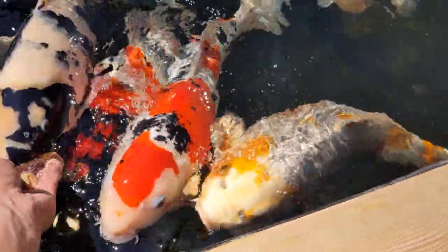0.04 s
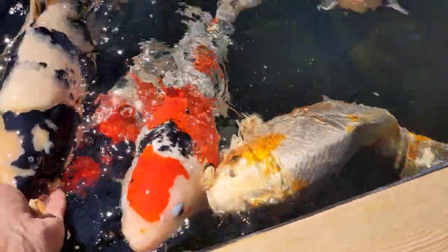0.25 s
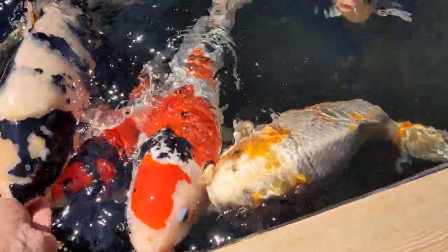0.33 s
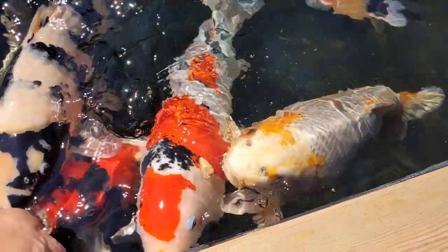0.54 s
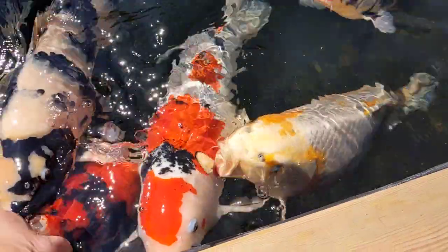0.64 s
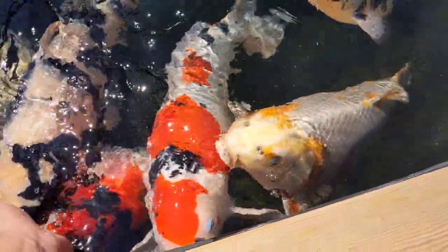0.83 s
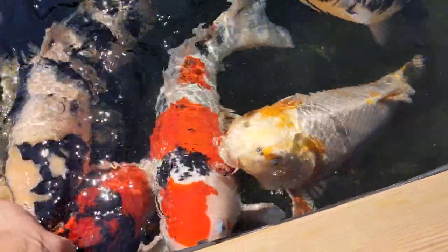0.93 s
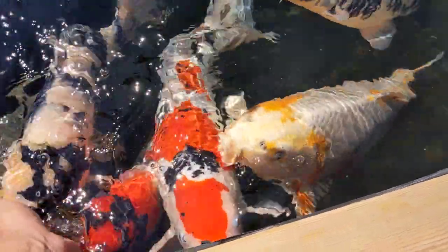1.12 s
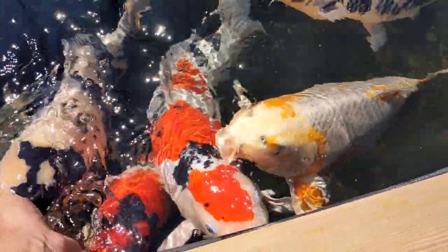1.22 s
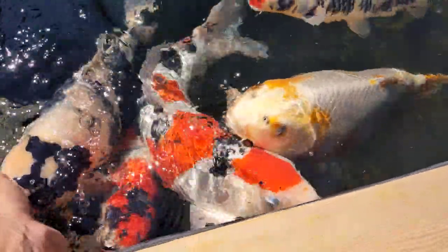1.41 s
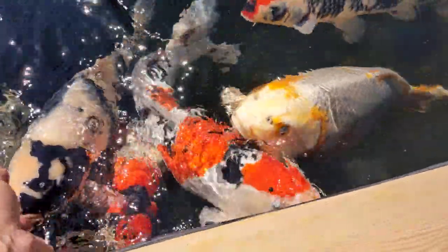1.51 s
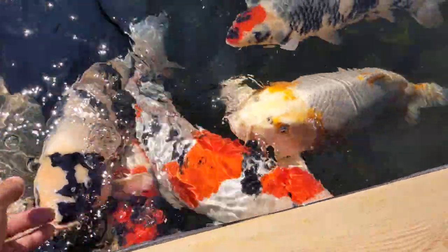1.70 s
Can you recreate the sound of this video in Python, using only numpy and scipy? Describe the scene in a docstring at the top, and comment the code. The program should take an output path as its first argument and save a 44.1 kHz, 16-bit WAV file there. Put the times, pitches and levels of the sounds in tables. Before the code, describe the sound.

Close up, fish smack and slurp at the surface of an outdoor pond. Two brief splashy bursts are followed by rising bubble chirps and lighter plops, while water laps gently and a pump hums faintly underneath.

```python
"""Carp feeding in a garden pond

Large carp feed at the surface, close to a pair of microphone ports. Their lips smack and slurp
in short wet splashes; trapped air pops, plops and chirps upward as it rises, and foam squelches.
Small bubbles and droplets tick in between, over lapping water and the low hum of a pump."""
import sys
import numpy as np
from scipy import signal
from scipy.fft import rfft, irfft
from scipy.io import wavfile

SR = 44100
rng = np.random.default_rng(int(sys.argv[2]) if len(sys.argv) > 2 else 0)


def unload_audio(sound):
    """Save the sound as a 16-bit wav file, at the path given as the first command line argument."""
    columns = np.transpose(np.atleast_2d(sound))
    # keep every value between -1 and 1, then stretch to whole-number steps
    steps = np.round(np.clip(columns, -1, 1) * 32767)
    wavfile.write(sys.argv[1], SR, steps.astype(np.int16))


N = 77175

# The wash of distant water and machinery. Each row: frequency in Hz, relative level in dB.
WASH_COLOUR = [(20, -28), (35, -4.5), (55, 3), (85, 15), (125, 0), (200, -11.5), (450, -11), (800, -12),
               (1800, -19.5), (3600, -26.5), (10000, -32), (16000, -44)]
# How alike left and right are in the wash and echoes. Each row: frequency in Hz, correlation.
STEREO_LIKENESS = [(30, 1), (300, 0.8), (1000, 0.61), (3000, 0.17), (15000, 0.13)]
# The fader ride on the stirred water. Each row: time in seconds, gain in dB.
STIR_FADER = [(0, -6.5), (.13, -6), (.3, -4), (0.399, 3), (.51, 0.5), (0.742, -4), (.83, -7.5), (.97, -2.5),
              (1.06, -1.5), (1.109, -7.5), (1.301, -1), (1.418, -1.5), (1.68, 2), (1.75, -11)]
# The tone of spray and ripples before their tilt. Each row: frequency in Hz, relative level in dB.
SPRAY_COLOUR = [(40, -51), (150, -5.5), (300, 2), (800, 7), (2000, -0.5), (2900, -2.5), (4200, -8),
                (6000, -9.5), (9600, -10.5), (13500, -20), (16000, -20.5)]
# Droplets and tiny bursting bubbles. Each row: start in seconds, pitch in Hz, level in dB.
TICK_CUES = [(.149, 4240, -34.5), (.2865, 5820, -20.5), (.478, 2220, -37.5), (.538, 3010, -30.5),
             (.579, 1880, -23), (.597, 3840, -29.5), (.598, 8640, -29.5), (.602, 6250, -29.5),
             (.87, 6370, -15), (1.035, 5800, -38), (1.121, 9300, -39.5), (1.219, 3770, -38.5),
             (1.236, 11500, -38), (1.293, 14500, -31.5), (1.347, 6300, -33.5), (1.3663, 4950, -25),
             (1.454, 9940, -31.5)]
# Water sucked in or thrown up as spray. Each row: start in seconds, hold in seconds, level in dB,
# tilt in dB per octave, fade (t60) in seconds.
SLURP_CUES = [(.15, 0.0065, -50, 3.5, .05), (.2015, 0.0064, -39, 2.5, 0.012),
              (0.2132, 0.013, -30, 3.5, 0.027), (0.226, 0.012, -21.5, 2.5, 0.037),
              (0.2423, 0.0055, -18, 1.35, 0.014), (0.253, 0.012, -36.5, 0.5, 0.078),
              (.286, 0.0017, -30, 4, 0.017), (0.578, 0.02, -44, 2.5, 0.18), (.681, 0.032, -24, 0.96, 0.012),
              (0.72, 0.0078, -47.5, 4, 0.13), (0.8689, 0.0042, -22, 2.5, 0.0089),
              (.875, 0.011, -31.5, 0.2, 0.099), (0.9237, 0.0012, -21.5, -3, 0.0077),
              (0.936, 0.0062, -19, 1, 0.005), (0.943, 0.013, -32.5, 0, 0.042),
              (1.152, 0.025, -47, -8.5, 0.14), (1.3648, 0.0029, -31.5, -0.4, 0.009),
              (1.539, 0.019, -46.5, -3, .2)]
# Air pockets popping open at the lips. Each row: start in seconds, pitch in Hz, level in dB,
# rise in seconds, decay (t60) in seconds, glide in octaves.
POP_CUES = [(.188, 770, -28.5, 0.00075, 0.012, -0.32), (0.1953, 954, -29, 0.0024, 0.068, 0.87),
            (0.2174, 832, -16.5, 0.0015, 0.022, 0.37), (.2275, 700, -17.5, 0.001, 0.02, 0.63),
            (.2428, 2080, -12.5, 0.0034, 0.018, -0.28), (0.2457, 840, -16.5, 0.0013, 0.012, 0.03),
            (.248, 472, -17.5, 0.0031, 0.02, -0.066), (.245, 244, -31, 0.0028, 0.03, 0.67),
            (.402, 468, -35, .0012, .02, -0.0044), (.503, 440, -37, 0.0028, 0.037, 0.25),
            (.58, 466, -33.5, 0.0019, 0.026, -0.098), (0.634, 990, -22.5, 0.0015, 0.0074, -0.19),
            (0.6431, 1270, -22.5, 0.00077, 0.0034, -0.021), (0.653, 1130, -30.5, 0.0019, 0.029, -0.15),
            (.681, 1360, -7, 0.00079, 0.002, 0.38), (0.8716, 1206, -7, 0.0015, 0.0041, -0.025),
            (0.872, 2403, -7, 0.0012, 0.0011, -0.44), (.8745, 867, -18, 0.0011, 0.035, -0.53),
            (.8835, 610, -27.5, .001, 0.055, -0.35), (0.907, 514, -25.5, 0.0023, 0.026, -.4),
            (.925, 280, -26.5, .0015, 0.014, -.3), (.9363, 500, -14.5, 0.0013, 0.0099, -0.047),
            (.938, 2816, -2.5, 0.0012, 0.002, -0.15), (0.9433, 3030, -16.5, 0.00037, 0.0095, 0.26),
            (.9362, 208, -22, 0.0013, 0.048, 0.21), (.97, 229, -39.5, 0.005, .09, 0.16),
            (1.015, 450, -34, 0.0011, 0.035, 0.6), (1.145, 233, -34.5, 0.011, 0.04, 0.23),
            (1.303, 770, -38, 0.0018, .018, -0.099), (1.332, 462, -37.5, 0.0014, 0.041, -0.088),
            (1.368, 438, -35.5, 0.0017, 0.028, -0.18), (1.379, 2640, -19, 0.00074, 0.018, -0.96),
            (1.39, 315, -35, 0.00067, 0.073, -0.28), (1.4062, 843, -21.5, .0012, 0.027, 0.045),
            (1.413, 724, -30, 0.0011, 0.031, -0.4), (1.419, 1010, -32.5, 0.0023, 0.06, 0.5),
            (1.531, 280, -30, 0.0027, 0.047, 0.91), (1.5491, 643, -24, 0.0018, 0.0052, -0.38),
            (1.726, 796, -40.5, 0.00058, 0.027, -0.089)]
# Bubbles nearing the surface. Each row: start in seconds, length in seconds, first pitch in Hz,
# last pitch in Hz, level in dB, crest of the swell as a share of the length.
CHIRP_CUES = [(0.245, 0.044, 905, 2407, -28.5, 0.42), (.44, 0.055, 960, 1350, -41, 0.11),
              (0.542, 0.036, 700, 1480, -45.5, 0.29), (1.152, 0.027, 953, 1840, -45.5, 0.11),
              (1.191, 0.044, 386, 994, -26, 0.73), (1.178, .115, 205, 1030, -35.5, 0.61),
              (1.234, 0.02, 790, 1000, -22.5, 0.058), (1.231, .04, 1050, 1250, -37.5, .06),
              (1.446, 0.057, 537, 1700, -31.5, 0.41)]
# Foam squeezed between bodies. Each row: start in seconds, length in seconds, centre in Hz, level in dB.
SQUELCH_CUES = [(.335, 0.11, 2374, -48.5), (.565, 0.035, 2618, -42), (1.015, .06, 2290, -51),
                (1.408, 0.04, 2746, -45)]
# The outdoor echo tail. Each row: frequency in Hz, decay (t60) in seconds.
TAIL_DECAY = [(150, 0.41), (800, 0.12), (3000, 0.14), (14000, 0.082)]
# Phase between the ports. Each row: frequency in Hz, lead of the left in radians.
PORT_PHASE = [(60, 0.5), (500, -1), (1000, 0.95), (1500, 1.05), (2000, 3.5), (2700, 6), (3700, 4.5),
              (4700, 8), (7000, 9.5), (16000, 22)]
# Balance between the ports. Each row: frequency in Hz, left minus right in dB.
PORT_BALANCE = [(250, 2.5), (450, 6), (740, -1), (1220, -0.5), (2000, -13), (3300, 1.5), (5500, 5.5),
                (9000, 0), (15000, -1)]

LN_1000 = np.log(1000)  # a 60 dB fall, which takes one t60


def amp(db):
    """Decibels to gain."""
    return 10 ** (np.asarray(db) / 20)


def unit(x):
    """Scales to rms 1."""
    return x / np.sqrt(np.mean(x ** 2) + 1e-20)


def curve_at(points, hz):
    """Reads a table on a log-frequency axis."""
    f, value = np.transpose(points)
    return np.interp(np.log(hz + 1), np.log(f + 1), value)


def add(mix, start_s, sound):
    """Lays a stereo sound into the mix."""
    part = mix[:, max(round(start_s * SR), 0):][:, :sound.shape[1]]
    part += sound[:, :part.shape[1]]


def wander(hz, size):
    """Smooth random movement of rms 1, rolling off above hz."""
    f = np.fft.rfftfreq(size, 1 / SR)
    return unit(irfft(rfft(rng.standard_normal(size)) / (1 + (f / hz) ** 4), size))


def clicks(per_s, spread_db, size):
    """Random impulses, mostly small, a few large."""
    height = amp(spread_db * np.minimum(rng.exponential(1, size), 4)) * rng.choice([-1, 1], size)
    return height * (rng.random(size) < per_s / SR)


def spray_eq(size, tilt_db):
    """The spray's gain at each frequency, tilted by tilt_db per octave around 2 kHz."""
    hz = np.fft.rfftfreq(size, 1 / SR)
    return amp(curve_at(SPRAY_COLOUR, hz) + tilt_db * np.log2((hz + 100) / 2000))


def air_ring(hz, rise, t60, glide, rough=0.14, size=8192):
    """An air pocket swells, then dies away while its pitch glides; its walls tremble."""
    t = np.arange(size) / SR
    pitch = hz * 2 ** (glide * np.minimum(t / t60, 1))
    attack = np.sin(np.pi / 2 * np.minimum(t / rise, 1)) ** 2
    decay = np.exp(-LN_1000 * np.maximum(t - rise, 0) / t60)
    phase = 2 * np.pi * np.cumsum(pitch) / SR
    tremble_hz = 890 + hz / 4
    tone = np.sin(phase) * (1 + rough * wander(tremble_hz, size))
    jitter = rough * wander(tremble_hz, size) * np.cos(phase)
    return attack * decay * (tone + jitter)


def distant_wash(db=-55.5):
    """A soft bed of far-off water and machinery, centred in the bass and wide on top."""
    hz = np.fft.rfftfreq(N, 1 / SR)
    left, other = rfft(rng.standard_normal((2, N)))
    likeness = curve_at(STEREO_LIKENESS, hz)
    right = likeness * left + np.sqrt(1 - likeness ** 2) * other
    return amp(db) * unit(irfft(np.array([left, right]) * amp(curve_at(WASH_COLOUR, hz)), N))


def pump_hum(hz=89, db=-67, waver=0.61):
    """The pump's low tone, wavering in phase and level."""
    phase = 2 * np.pi * hz * np.arange(N) / SR + waver * wander(13, N)
    return amp(db) * unit(np.sin(phase) * (1 + waver * wander(8.8, N)))


def bubble_cloud(pitches, per_s, db, spread_db, tilt_db, cycles, glide):
    """Small bubbles of many sizes ring at random, each size from its own direction."""
    out = np.zeros((2, N))
    for hz in pitches:
        gain = amp(db + tilt_db * np.log2(hz / pitches[0]))
        bubble = gain * air_ring(hz, rise=1 / hz, t60=cycles / hz, glide=glide)
        train = signal.oaconvolve(clicks(per_s / len(pitches), spread_db, N), bubble)[:N]
        out += [train, np.roll(train, rng.integers(-6, 7))]  # panned by a few samples of lag
    return out


def stirred_water(ripple_db=-58, clump_db=5):
    """Low lapping, bubbling, clumps of fine fizz and a soft rush of ripples around the moving fish."""
    lapping = bubble_cloud(np.geomspace(175, 480, 8), per_s=160, db=-54.5,
                           spread_db=2.8, tilt_db=-0.5, cycles=6, glide=0.13)
    bubbles = bubble_cloud(np.geomspace(400, 3300, 24), per_s=600, db=-60,
                           spread_db=4, tilt_db=1.24, cycles=19.7, glide=0.3)
    fizz = bubble_cloud(np.geomspace(3800, 14000, 12), per_s=110, db=-57.5,
                        spread_db=2.8, tilt_db=5.5, cycles=30, glide=0)
    noise = rng.standard_normal((2, N))
    ripples = amp(ripple_db) * unit(irfft(rfft(noise) * spray_eq(N, tilt_db=1.76), N))
    clumps = amp(clump_db * np.tanh(wander(25, N)))
    water = lapping + bubbles + clumps * fizz + np.sqrt(clumps) * ripples
    fader_db = np.interp(np.arange(N) / SR, *np.transpose(STIR_FADER))
    return water * amp(fader_db)


def droplet_tick(hz, db, snap_db=-9.5, snap_t60=0.003, size=2048):
    """A droplet lands or a tiny bubble bursts: a broad little snap and a brief, rough ring."""
    t, f = np.arange(size) / SR, np.fft.rfftfreq(size, 1 / SR)
    band = np.exp(-np.log2((f + 1) / hz) ** 2)
    snap = unit(irfft(rfft(rng.standard_normal(size)) * band))
    snap *= amp(snap_db) * np.exp(-LN_1000 * t / snap_t60)
    ring = air_ring(hz, rise=0.00014, t60=0.0084, glide=0, rough=0.48, size=size)
    return amp(db) * (snap + ring)


def spray(hold, db, tilt_db, t60, rise=0.0012, flutter_db=2.5, size=16384):
    """A fluttering burst of tiny drops that starts sharply, holds, then fades."""
    t = np.arange(size) / SR
    drops_per_s = 9000 * min(amp(db + 27), 1)  # below -27 dB it thins toward separate clicks
    drops = clicks(drops_per_s, spread_db=3.5, size=size)
    splash = irfft(rfft(drops) * spray_eq(size, tilt_db))
    flutter = amp(flutter_db * wander(195, size))
    envelope = np.minimum(t / rise, 1) * np.exp(-LN_1000 * np.maximum(t - hold, 0) / t60)
    return amp(db) * unit(splash * flutter) * envelope


def slurp(*cue, width=0.56):
    """A smack of the lips spreads spray over the water, so its treble differs left and right."""
    side = signal.sosfilt(signal.butter(2, 1000, "high", fs=SR, output="sos"), spray(*cue))
    return spray(*cue) + width * np.outer([1, -1], side)


def lip_pop(hz, db, rise, t60, glide):
    """A pocket of air pops open at the lips and rings."""
    return amp(db) * air_ring(hz, rise, t60, glide)


def bubble_chirp(length, first_hz, last_hz, db, crest, wobble_db=1.75, pitch_tremble=0.014):
    """A rising bubble swells and fades as its pitch climbs, wobbling on the way."""
    progress = np.arange(0, length, 1 / SR) / length
    skewed = progress ** (np.log(.5) / np.log(crest))  # reaches one half at the crest
    swell = np.abs(np.sin(np.pi * skewed)) ** 0.63
    wobble, tremble = wander(150, size=16384).reshape(2, -1)[:, :len(progress)]
    pitch = first_hz * (last_hz / first_hz) ** progress * (1 + pitch_tremble * tremble)
    return amp(db + wobble_db * wobble) * swell * np.sin(2 * np.pi * np.cumsum(pitch) / SR)


def foam_squelch(length, hz, db, width_hz=1170, glide_octaves=0.5, size=8192):
    """Squeezed foam rings in a broad, fuzzy resonance that climbs as the gap closes."""
    progress = np.minimum(np.arange(size) / SR / length, 1)
    centre_hz = hz * 2 ** (glide_octaves * (progress - .5))
    carrier = np.exp(2j * np.pi * np.cumsum(centre_hz) / SR)
    foam = wander(width_hz / 2, size) + 1j * wander(width_hz / 2, size)
    return amp(db) * np.sin(np.pi * progress) * (foam * carrier).real


def placed(sound, max_lag_s=0.00004):
    """Each sound comes from a slightly different spot, so its lag between the ports varies."""
    size = 2 * len(sound)
    lag_s = max_lag_s * (2 * rng.random() - 1)
    half_shift = np.exp(1j * np.pi * np.fft.rfftfreq(size, 1 / SR) * lag_s)
    return irfft(rfft(sound, size) * np.array([half_shift, 1 / half_shift]))[:, :len(sound)]


def feeding_carp():
    """The foreground: every slurp, pop, chirp, squelch and tick on its cue."""
    out = np.zeros((2, N))
    for start_s, *cue in SLURP_CUES:
        add(out, start_s, slurp(*cue))
    for cues, source in [(POP_CUES, lip_pop), (CHIRP_CUES, bubble_chirp),
                         (SQUELCH_CUES, foam_squelch), (TICK_CUES, droplet_tick)]:
        for start_s, *cue in cues:
            add(out, start_s, placed(source(*cue)))
    return out


def pond_echoes(mono, rim_db=-8.5, rim_t60=0.024, tail_db=-16.5, size=16384):
    """Quick reflections off the rim and a faint outdoor tail, both narrow in the bass."""
    hz, frame_s, noise = signal.stft(rng.standard_normal((3, size)), SR, nperseg=256)
    likeness = curve_at(STEREO_LIKENESS, hz)[:, None]
    diffuse = likeness * noise[2] + np.sqrt(1 - likeness ** 2) * noise[:2]
    tail_fade = np.exp(-LN_1000 * frame_s / curve_at(TAIL_DECAY, hz)[:, None])
    tail = signal.istft(diffuse * tail_fade, SR, nperseg=256)[1]
    t = np.arange(size) / SR
    rim_fade = np.exp(-LN_1000 * t / rim_t60) * (t > .0015)  # 1.5 ms of pre-delay
    rim = signal.istft(diffuse, SR, nperseg=256)[1][:, ::-1] * rim_fade
    response = amp(tail_db) * tail / np.linalg.norm(tail[0]) + amp(rim_db) * rim / np.linalg.norm(rim[0])
    return signal.fftconvolve(mono[None], response, axes=1)[:, :N]


def ports(pond, low_cut_hz=90):
    """The water is heard without deep bass, mostly left port first, each port with its own colour."""
    hz = np.fft.rfftfreq(2 * N, 1 / SR)
    low_cut = hz ** 2 / (hz ** 2 + low_cut_hz ** 2)
    left = amp(curve_at(PORT_BALANCE, hz) / 2) * np.exp(.5j * curve_at(PORT_PHASE, hz))
    return irfft(rfft(pond, 2 * N) * low_cut * np.array([left, 1 / left]))[:, :N]


def scene():
    """Carp, their echoes and stirred water up close, over the wash and the pump."""
    carp = feeding_carp()
    pond = carp + pond_echoes(carp.mean(0)) + stirred_water()
    return ports(pond) + distant_wash() + pump_hum()


def record(dry):
    """A soft clip rounds the loudest peaks; a steep low-pass trims the very top."""
    rounded = dry / (1 + dry ** 8) ** (1 / 8)
    low_pass = signal.firwin(401, cutoff=16300, window=("kaiser", 9), fs=SR)
    return signal.oaconvolve(rounded, low_pass[None], "same")


dry = scene()
out = record(dry)
unload_audio(out)
```